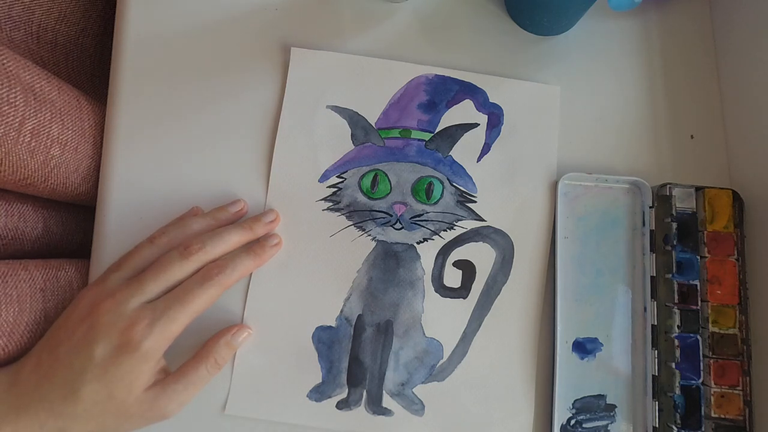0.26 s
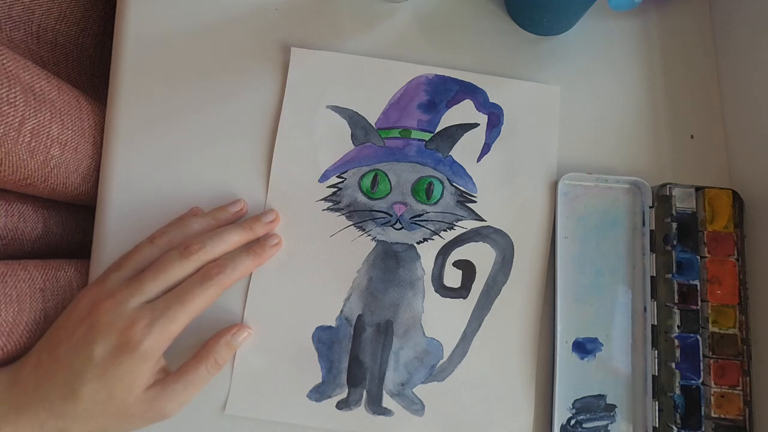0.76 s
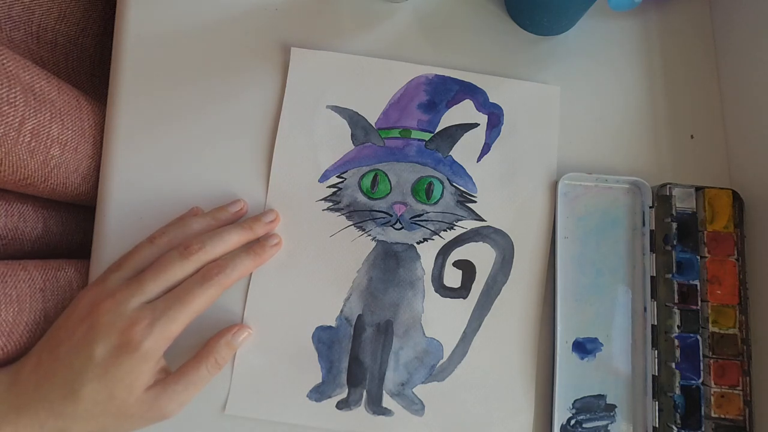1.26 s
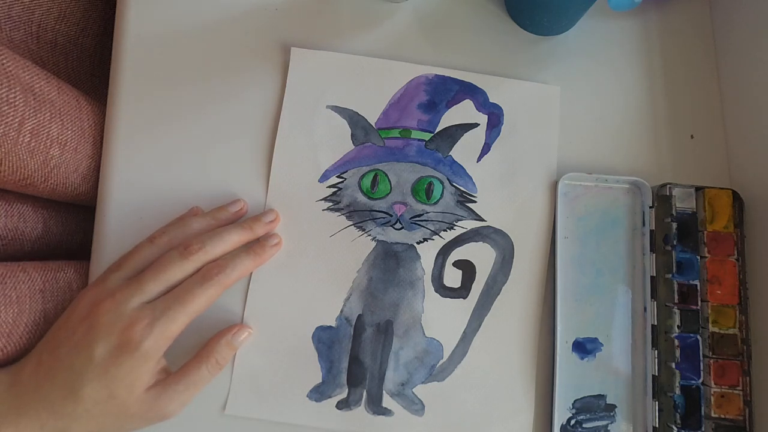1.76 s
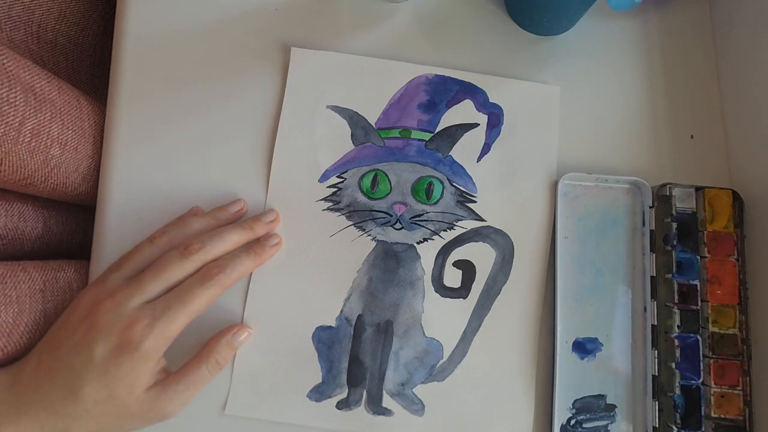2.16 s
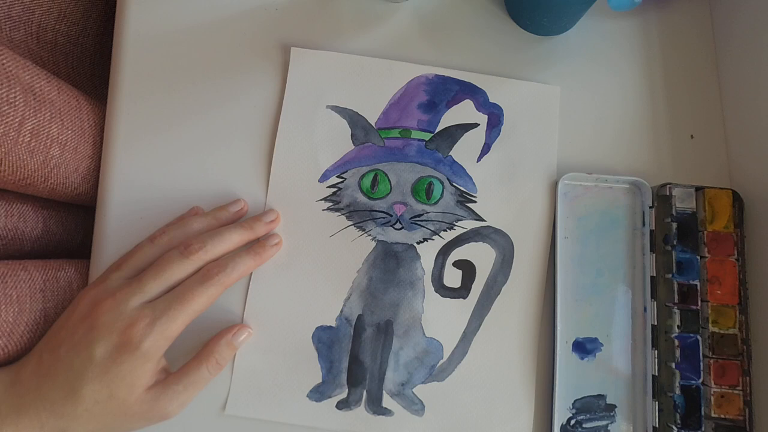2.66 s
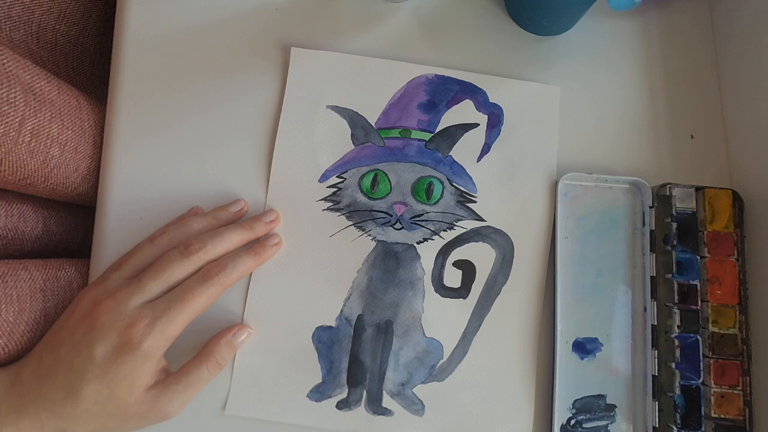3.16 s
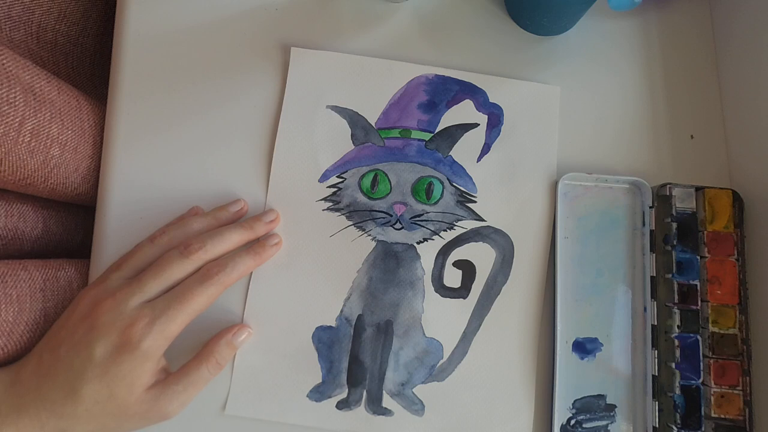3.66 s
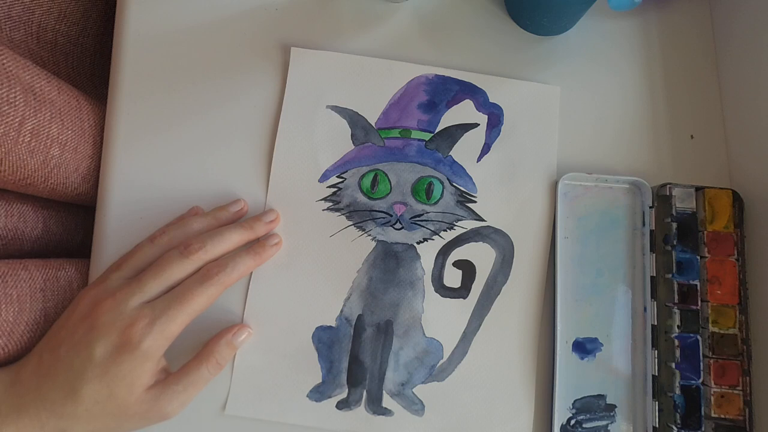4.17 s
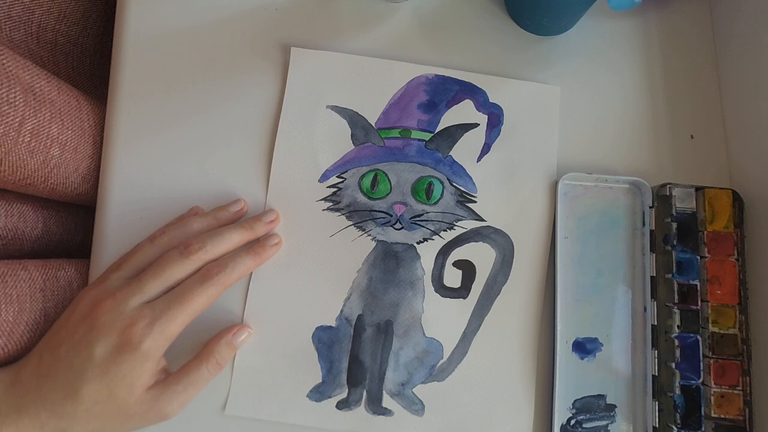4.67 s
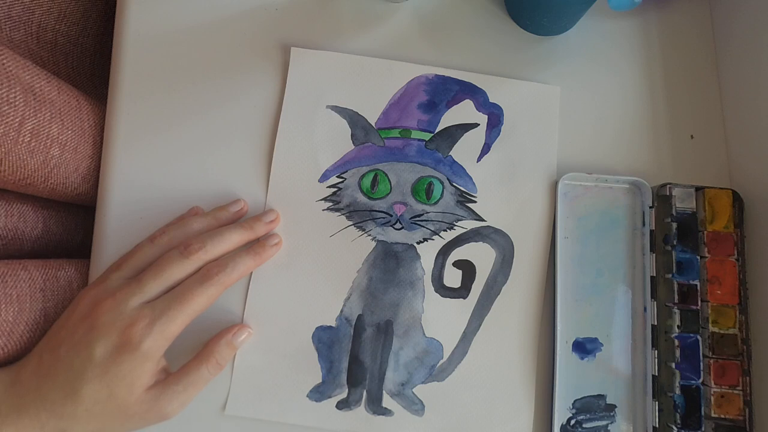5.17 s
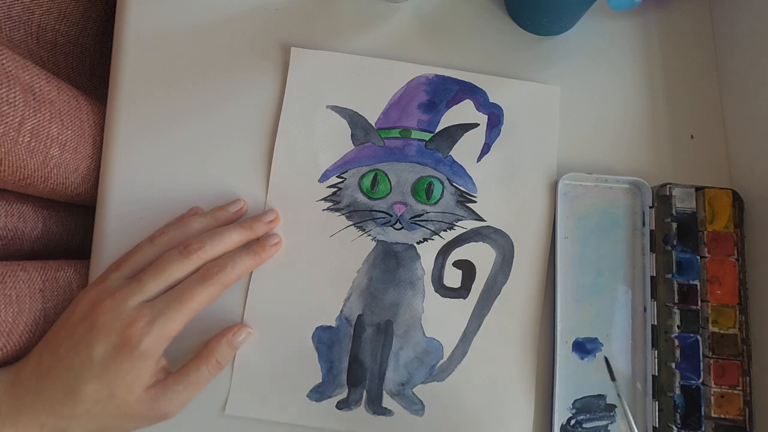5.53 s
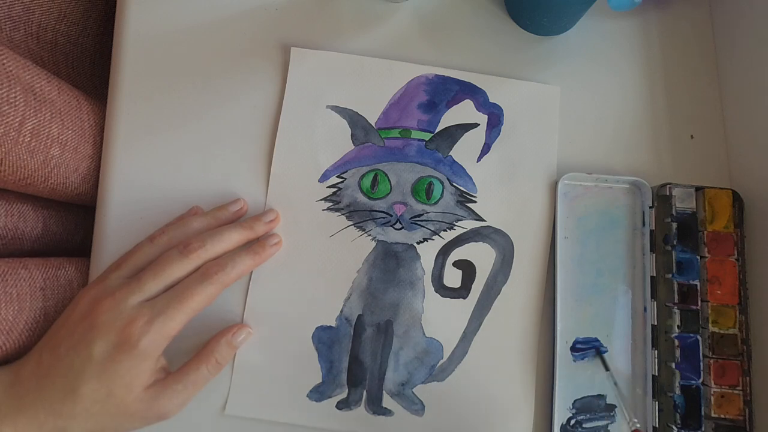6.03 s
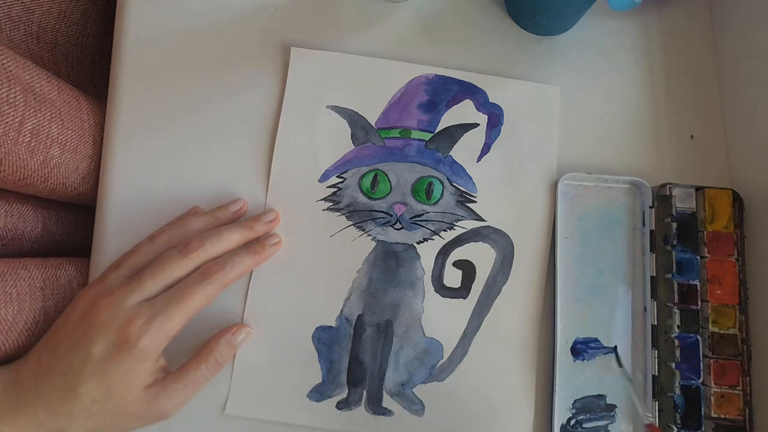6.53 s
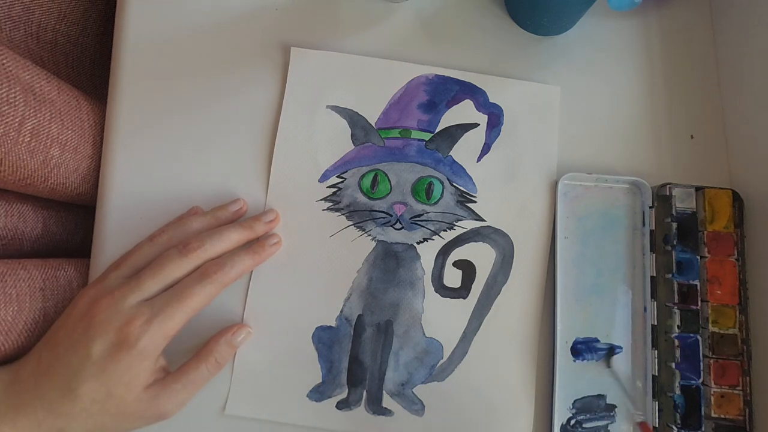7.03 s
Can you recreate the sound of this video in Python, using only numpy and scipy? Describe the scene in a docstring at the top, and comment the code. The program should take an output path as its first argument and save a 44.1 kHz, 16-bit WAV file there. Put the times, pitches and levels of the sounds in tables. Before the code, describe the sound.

Small water plips and several bright clinks of a brush on a glass jar, followed by light desk knocks and faint, quick dabbing.

```python
"""A desk in a small quiet room, one microphone on a stand; an appliance hums and the air hisses.
A paintbrush is rinsed in a glass water jar: bubbles plip and fizz, handle and ferrule clink on the rim
and set the glass ringing, and wet bristles are wiped over it. Then the brush dabs paint, rocking a
hollow plastic palette. Arm and hand knock the desk, and the desk sways the microphone stand."""
import sys
import numpy as np
from scipy import signal
from scipy.fft import rfft, irfft, next_fast_len
from scipy.io import wavfile
from scipy.ndimage import map_coordinates

SR = 44100
rng = np.random.default_rng(int(sys.argv[2]) if len(sys.argv) > 2 else 0)


def dump_mix(stems):
    """Bounce the given channels to the path in sys.argv[1] as a 16-bit WAV at rate SR."""
    frames = np.atleast_2d(stems).T  # one column per channel
    limited = np.clip(frames, -1, 1)  # hard clip at full scale
    pcm = np.round(limited * 32767).astype(np.int16)
    wavfile.write(sys.argv[1], SR, pcm)


N = 321930

# colour of the wooden handle's click: (frequency [Hz], level [dB])
HANDLE_CLICK = [(150, -45), (600, -26), (2000, -20), (3200, -5.5), (4300, -7.5), (5200, 6.5), (6400, -9.5),
                (7800, 2.5), (8700, -4.5), (9600, -3.5), (10300, -3.5), (11300, 0), (13000, -17),
                (15000, -24.5)]
# colour of a thud on the desk: (frequency [Hz], level [dB])
DESK_THUD = [(60, -21.5), (170, -3), (280, 1.5), (450, -3), (700, -8), (1200, -10), (2500, -10.5),
             (5000, -15.5), (12000, -61.5)]


def amp(db):
    """Decibels to gain."""
    return 10 ** (np.asarray(db) / 20)


def unit(x):
    """Scale to rms 1."""
    return x / np.sqrt(np.mean(x ** 2) + 1e-20)


def along(points, hz):
    """Read (frequency [Hz], value) points on a log frequency axis."""
    freqs, values = np.transpose(points)
    return np.interp(np.log(hz + 1), np.log(freqs + 1), values)


def clock(count=N):
    """Time of each sample in seconds."""
    return np.arange(count) / SR


def wobble(rate):
    """A smooth random curve, rate knots a second."""
    return map_coordinates(rng.standard_normal(int(N * rate / SR) + 4), [clock() * rate])


def swell(s, attack_s, hold_s, t60):
    """An envelope that rises from time s, holds and dies away."""
    t = clock() - s
    return np.clip(t / attack_s, 0, 1) * amp(-60 * np.maximum(t - attack_s - hold_s, 0) / t60)


def filtered(x, response):
    """Shape x by a gain that depends on frequency."""
    size = next_fast_len(N + SR // 2)
    return irfft(rfft(x, size) * response(np.fft.rfftfreq(size, 1 / SR)), size)[..., :N]


def noise(spectrum):
    """Coloured noise of rms 1."""
    return unit(filtered(rng.standard_normal(N), lambda hz: amp(along(spectrum, hz))))


def tone(hz, drift_hz, rate):
    """An unsteady sine of rms 1."""
    return unit(np.sin(2 * np.pi * np.cumsum(hz + drift_hz * wobble(rate)) / SR))


def pulse(spectrum, size=2048):
    """A causal pulse of peak 1 with the given colour, padded to half a second."""
    cepstrum = irfft(np.log(amp(along(spectrum, np.fft.rfftfreq(size, 1 / SR)))))
    fold = 1 + np.sign(np.fft.fftfreq(size))  # minimum phase: the energy comes first
    shape = irfft(np.exp(rfft(cepstrum * fold)))
    return np.pad(shape / np.abs(shape).max(), (0, SR // 2 - size))


def add(track, s, sound):
    """Mix a sound in at time s."""
    start = round(s * SR)
    track[start:start + len(sound)] += sound[:len(track) - start]


def chatter(x, share, t60):
    """A contact is not clean: tiny rebounds follow the first touch."""
    t = clock(count=1024)
    rebounds = rng.standard_normal(len(t)) * amp(-60 * t / t60)
    return x + share * signal.fftconvolve(x, rebounds / np.linalg.norm(rebounds))[:len(x)]


def ring(modes, scatter_db, flutter=0, flutter_rate=45):
    """Damped modes, struck at new strengths each time; flutter shakes their level and phase."""
    t = clock(count=SR // 2)
    out = np.zeros(len(t))
    for k, (hz, db, t60) in enumerate(modes):
        knots = rng.standard_normal((2, 128))
        tremble, drift = (np.interp(t * flutter_rate, np.arange(len(row)), row) for row in knots)
        level_db = db + scatter_db * rng.normal() - 60 * t / t60
        envelope = amp(level_db) * (1 + flutter * tremble)
        out += (-1) ** k * envelope * np.sin(2 * np.pi * hz * t + flutter * drift)
    return out


def in_room(x, near_db, wall_db, near_t60=0.089):
    """The microphone hears the direct sound, scatter from things nearby, then the walls farther off."""
    # the room's decay: (frequency [Hz], t60 [s])
    wall_decay = [(200, 0.42), (1000, 0.39), (4000, 0.45), (9000, 0.27), (15000, 0.25)]
    hz, s, bands = signal.stft(rng.standard_normal(SR // 2), SR, nperseg=256)
    walls = signal.istft(bands * amp(-60 * s / along(wall_decay, hz)[:, None]), SR)[1]
    t = clock(count=len(walls))
    walls *= 1 - np.exp(-t / 0.0033)
    near = rng.standard_normal(len(t)) * amp(-60 * t / near_t60) * (t > .001)
    echo = amp(near_db) * near / np.linalg.norm(near) + amp(wall_db) * walls / np.linalg.norm(walls)
    return signal.fftconvolve(x, echo + (t == 0))


def compression_flicker():
    """A faint 8-12 kHz flicker like that of audio compression, not a sound of the room."""
    # the band of the compression-like artefact: (frequency [Hz], level [dB])
    artefact_band = [(7000, -41.5), (8200, 0), (9000, -1), (10700, -10), (11700, -1.5), (12800, -14)]
    return amp(-92 + 5 * wobble(14)) * noise(artefact_band)


def room_tone(whine_hz=4090, whine_half_width_hz=260):
    """An appliance hums and the air hisses with a thin fluttering whine."""
    # room air and microphone hiss: (frequency [Hz], level [dB])
    air_colour = [(15, 6.5), (50, -3.5), (75, -6.5), (110, -10.5), (190, -15), (300, -23), (600, -26.5),
                  (1300, -31), (3500, -35), (7200, -35), (8700, -34), (10800, -37.5), (11700, -34.5),
                  (13000, -40.5), (15000, -38)]
    hum = amp(-71.5 + 1.5 * wobble(8.3)) * tone(hz=129.2, drift_hz=2, rate=11)
    white = rng.standard_normal(N)
    narrow_band = unit(filtered(white, lambda hz: 1 / (1 + ((hz - whine_hz) / whine_half_width_hz) ** 2)))
    air = amp(-61.5) * noise(air_colour)
    whine = amp(-83 + 3 * wobble(90)) * narrow_band
    return hum + air + whine


def stand_sway(rest_db=-62):
    """The microphone stand shudders at its own low pitch, never quite still, more after each jolt."""
    # the moving arm jolts the desk: (time [s], level [dB])
    jolts = [(2.08, -64.5), (2.68, -55), (3.3, -51.5), (3.85, -57.5), (4.32, -50.5)]
    jolt_power = sum((amp(db) * swell(s, attack_s=.06, hold_s=.2, t60=.6)) ** 2 for s, db in jolts)
    rest = amp(rest_db + 2.5 * wobble(6))
    return np.sqrt(rest ** 2 + jolt_power) * amp(wobble(16)) * tone(hz=33.7, drift_hz=2.2, rate=11)


def rustle():
    """Something soft shifts once near the desk."""
    # a low, muffled noise: (frequency [Hz], level [dB])
    soft_colour = [(60, -16), (140, 6), (200, -0.5), (300, -16), (500, -20.5), (900, -34), (4000, -32.5)]
    return amp(-59.5) * swell(s=0.764, attack_s=.06, hold_s=.1, t60=.45) * noise(soft_colour)


def arm_bumps():
    """The arm lands softly on the desk and gives only a low push."""
    # the landings: (time [s], level [dB])
    landings = [(1.718, -60.5), (1.838, -56), (2.19, -56)]
    # their dull colour: (frequency [Hz], level [dB])
    bump_colour = [(100, -8), (220, 4.5), (400, -1), (600, -19), (1200, -36), (4000, -58)]
    out = np.zeros(N)
    for s, db in landings:
        add(out, s, in_room(amp(db) * pulse(bump_colour), near_db=-6, wall_db=-10))
    return out


def desk_knocks(hollow_db=-20):
    """Light knocks of brush and hand ring the hollow desk briefly and leave the glass silent."""
    # the knocks: (time [s], thud [dB], click [dB])
    knocks = [(2.004, -56.5, -56), (2.533, -59, -55), (2.616, -56.5, -72), (2.9834, -41, -45.5),
              (4.028, -46, -60), (4.4512, -41, -34), (4.732, -57.5, -61), (5.005, -56, -53.5)]
    # modes of the desk and handle: (frequency [Hz], level [dB], t60 [s])
    hollow_modes = [(255, -16, .12), (405, -1, .22), (465, -7, .12), (5280, -4, .04), (7850, -4, .04)]
    out = np.zeros(N)
    for s, thud_db, click_db in knocks:
        thud = amp(thud_db) * pulse(DESK_THUD)
        click = amp(click_db) * chatter(pulse(HANDLE_CLICK), share=1.2, t60=.014)
        add(out, s, in_room(thud + click, near_db=2.5, wall_db=-6))
        add(out, s, amp(thud_db + hollow_db) * ring(hollow_modes, scatter_db=1))
    return out


def bristle_wipes(grain_db=3):
    """Wet bristles slip over glass and plastic in a short grainy hiss."""
    # the strokes: (time [s], half length [s], level [dB])
    strokes = [(2.96, 0.041, -59.5), (3.532, 0.007, -69.5), (4.602, .012, -73.5), (5.843, 0.035, -71.5)]
    # the bristles' hiss: (frequency [Hz], level [dB])
    bristle_colour = [(2000, -22), (6000, -7.5), (7500, -8.5), (9000, -3), (11500, -15.5), (15000, -18)]
    envelope = sum(amp(db) * np.exp(-((clock() - s) / half) ** 2) for s, half, db in strokes)
    hiss = unit(noise(bristle_colour) * amp(grain_db * wobble(660)))
    return in_room(envelope * hiss, near_db=-16, wall_db=-13.5)[:N]


def water_fizz(from_s=2.0, to_s=2.5, faintest_db=-70, spread_db=10, count=36):
    """Water stirred by the brush crackles with tiny bubbles."""
    out, t = np.zeros(N), clock(count=512)
    for when, strength, pitch in rng.random((count, 3)):
        hz = np.interp(pitch, [0, 1], [3000, 10500])
        bubble = np.exp(-t * hz / 5.5) * np.sin(2 * np.pi * hz * t)
        add(out, from_s + when * (to_s - from_s), amp(faintest_db + spread_db * strength) * bubble)
    return in_room(out, near_db=-10, wall_db=-9)[:N]


def water_drips(rise=0.16, ring_cycles=65):
    """Each drip traps a cluster of bubbles whose pitch climbs as they die; small ones die sooner."""
    # large plips and tiny pops: (time [s], starting frequency [Hz], level [dB])
    drips = [(1.916, 3200, -50), (2.079, 1520, -52.5), (2.082, 10240, -49), (2.116, 1416, -51),
             (2.239, 1478, -48.5), (2.26, 8600, -43.5), (2.327, 1580, -56), (2.337, 8400, -49),
             (2.351, 1735, -61), (2.385, 1830, -66), (2.392, 8870, -53), (2.417, 8750, -54),
             (2.428, 4360, -61)]
    out, t = np.zeros(N), clock(count=SR // 4)
    for s, hz, db in drips:
        t60 = ring_cycles / hz
        pitch = hz * (1 + rise * np.minimum(t / t60, 1))
        envelope = amp(db - 60 * t / t60) * (1 - np.exp(-t * hz))
        bubble = envelope * np.sin(2 * np.pi * np.cumsum(pitch) / SR)
        add(out, s, in_room(chatter(bubble, share=.6, t60=.04), near_db=-5, wall_db=-5))
    return out


def palette_dabs():
    """Each stroke of the brush rocks the hollow palette against the desk."""
    # about six strokes a second: (time [s], gain [dB])
    strokes = [(6.003, -48), (6.170, -50), (6.332, -47.5), (6.499, -46.5), (6.655, -42), (6.810, -44.5),
               (6.972, -45.5), (7.132, -44), (7.293, -43)]
    # modes of the plastic: (frequency [Hz], level [dB], t60 [s])
    palette_modes = [(290.5, -6, 0.092), (378, -4, 0.036), (474, -3, 0.04), (547.5, -3, 0.037),
                     (737, -6, 0.021), (1356, -11.5, 0.022), (1520, -14, 0.015), (2090, -8, 0.012),
                     (2880, -18.5, 0.0075)]
    out = np.zeros(N)
    for s, db in strokes:
        plastic = amp(-5.5) * ring(palette_modes, scatter_db=1)
        thud = amp(-15) * pulse(DESK_THUD)
        click = amp(-16) * chatter(pulse(HANDLE_CLICK), share=2, t60=0.051)
        add(out, s, in_room(amp(db) * (plastic + thud + click), near_db=-2, wall_db=-13))
    return out


def handle_rattle(t60, first_gap_s=0.0041, last_gap_s=0.0013, rebound_db=-11, count=90):
    """One clean touch, then the springy handle rebounds faster and more weakly."""
    gaps = last_gap_s + (first_gap_s - last_gap_s) * .5 ** np.arange(count)
    times = np.cumsum(gaps * np.exp(0.23 * rng.standard_normal(count)))
    sizes = amp(rebound_db - 60 * times / t60 + rng.standard_normal(count))
    sizes *= rng.choice([-1, 1], count) / np.arange(1, count + 1) ** 1.2
    train = np.bincount(np.round(times * SR).astype(int), sizes)
    train[0] = 1
    return train


def jar_clinks():
    """The brush clicks on the rim; where it lands decides which modes of the glass ring."""
    # hits on the rim: (time [s], click [dB], ferrule [dB], tip [dB], low ring [dB], middle ring [dB],
    # high ring [dB], share of the free ring time [ratio], rattle t60 [s])
    hits = [(1.926, -23, -28, -51, -59, -44, -64, 0.65, 0.077),
            (2.195, -43.5, -76, -70, -78, -56, -84, 0.51, 0.054),
            (2.23, -55, -72, -78, -53, -82, -83, 0.32, .05),
            (2.352, -56, -79, -80, -56.5, -72, -80, 0.094, .08),
            (2.8005, -12.5, -24, -26.5, -37.5, -31, -42.5, 0.83, 0.28),
            (3.2845, -12.5, -31.5, -19, -43, -35, -44, 0.53, .05),
            (3.648, -17.5, -9.5, -25, -55.5, -45, -28.5, 0.39, .05),
            (3.6944, -27, -13, -37, -68.5, -45, -44.5, 0.89, .02)]
    # modes of the jar with its water: (frequency [Hz], level [dB], free t60 [s])
    jar_modes = [(1459, -23, .33), (2342, -23, .5), (2606, -21, .3), (3494, -1.5, .68), (3763, -11.5, .45),
                 (4646, -24, .35), (4912, 2.5, .42), (5064, -11, .18), (5218, -13, .15), (6062, -19, .3),
                 (7219, -16, .28), (7750, -12, .25), (8440, -13, .22), (8882, -2, .25), (9595, 2, .22),
                 (10040, -13, .16), (10755, -12, .2), (11260, -12, .2), (13085, -14, .2)]
    # the metal ferrule's hard spike: (frequency [Hz], level [dB])
    ferrule_colour = [(1000, -41), (5000, -20), (6700, -12), (7700, 0), (9600, 1), (11500, -11),
                      (13000, -17), (15000, -15.5)]
    # the thin end of the handle: (frequency [Hz], level [dB])
    tip_colour = [(1000, -41), (8000, -25.5), (10300, -8), (11300, 1), (12400, -6), (13300, -16),
                  (15000, -16.5)]
    out = np.zeros(N)
    for s, click_db, ferrule_db, tip_db, low_db, middle_db, high_db, ring_share, rattle_t60 in hits:
        click = amp(click_db) * chatter(pulse(HANDLE_CLICK), share=1, t60=.012)
        tip = amp(tip_db) * chatter(pulse(tip_colour), share=.85, t60=.004)
        ferrule = amp(ferrule_db) * chatter(pulse(ferrule_colour), share=.6, t60=.006)
        contact = signal.fftconvolve(click + tip + ferrule, handle_rattle(rattle_t60))
        add(out, s, in_room(contact, near_db=-6, wall_db=-11))
        # a brush that stays trembling on the rim shortens the ring and makes it flutter
        weights = [(3800, low_db), (4600, middle_db), (6000, middle_db), (7500, high_db)]
        modes = [(hz, db + along(weights, hz), ring_share * t60) for hz, db, t60 in jar_modes]
        glass = ring(modes, scatter_db=.7, flutter=.3)
        add(out, s, in_room(glass, near_db=-22, wall_db=-15))
        # a share of each contact reaches the desk through the jar's foot
        thud_gain = amp(click_db - 26) + amp(ferrule_db - 33.5) + amp(tip_db - 15.5)
        add(out, s, in_room(thud_gain * pulse(DESK_THUD), near_db=-1, wall_db=-6.5))
    return out


def scene():
    """The desk from one microphone position, alike in both channels."""
    contacts = jar_clinks() + desk_knocks() + arm_bumps()
    water = water_drips() + water_fizz()
    brushwork = bristle_wipes() + palette_dabs()
    background = stand_sway() + rustle() + room_tone() + compression_flicker()
    mono = background + brushwork + water + contacts
    return np.array([mono, mono])


def record(dry, top_hz=15300):
    """The recorder keeps nothing above its band limit."""
    return filtered(dry, lambda hz: 1 / (1 + (hz / top_hz) ** 120))


dry = scene()
out = record(dry)
dump_mix(out)
```